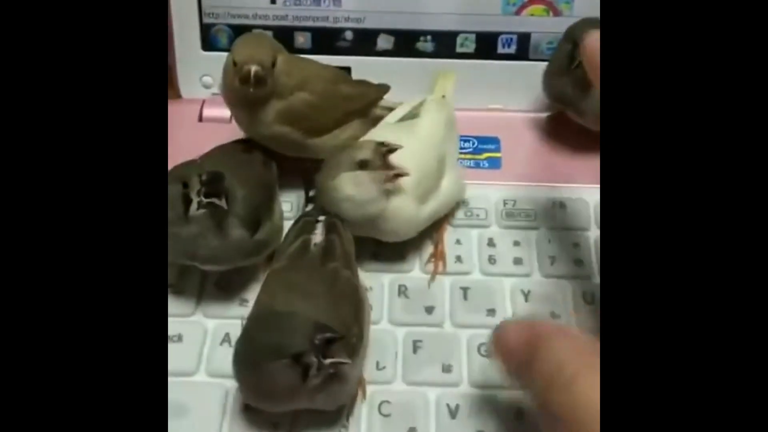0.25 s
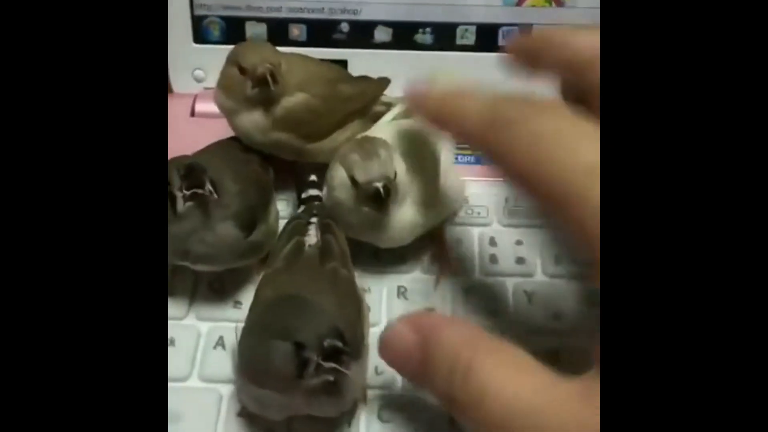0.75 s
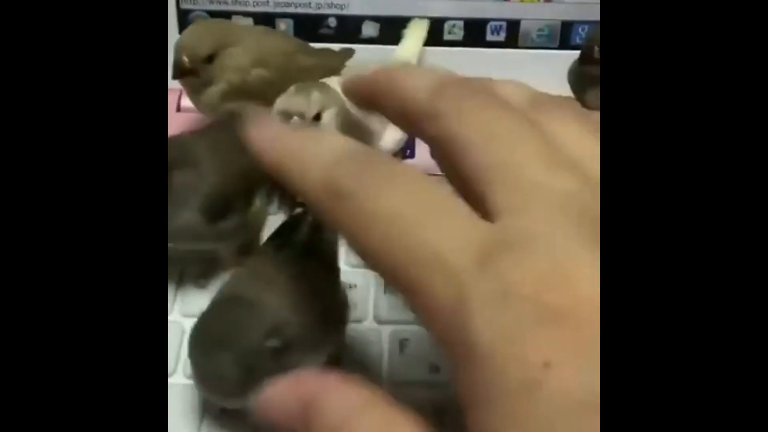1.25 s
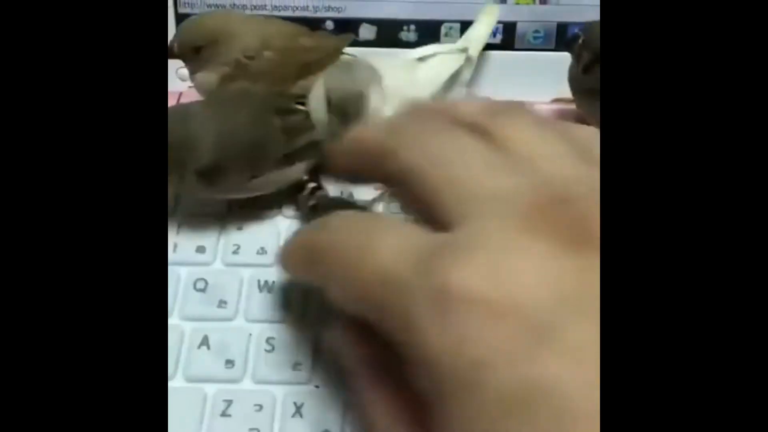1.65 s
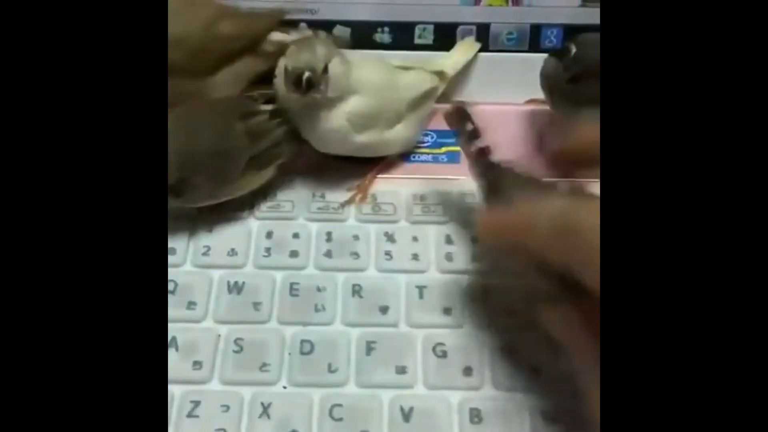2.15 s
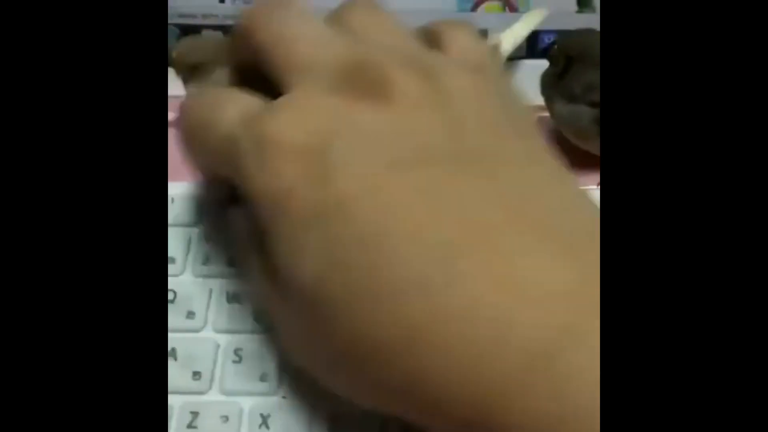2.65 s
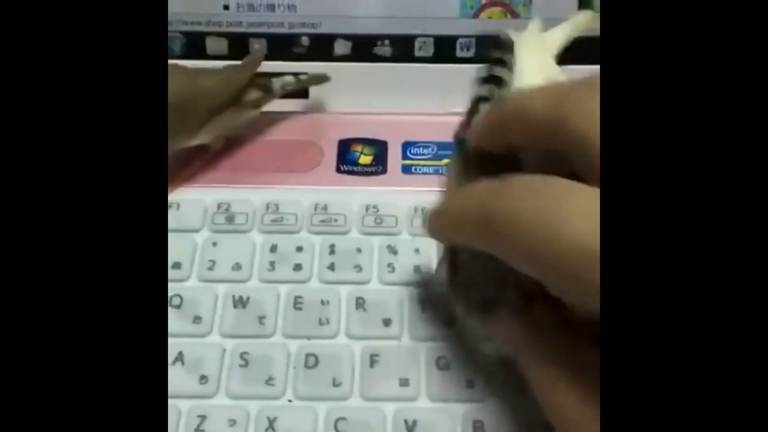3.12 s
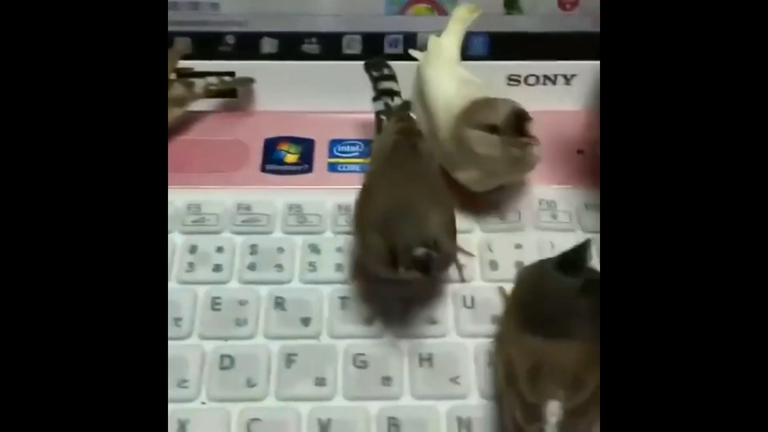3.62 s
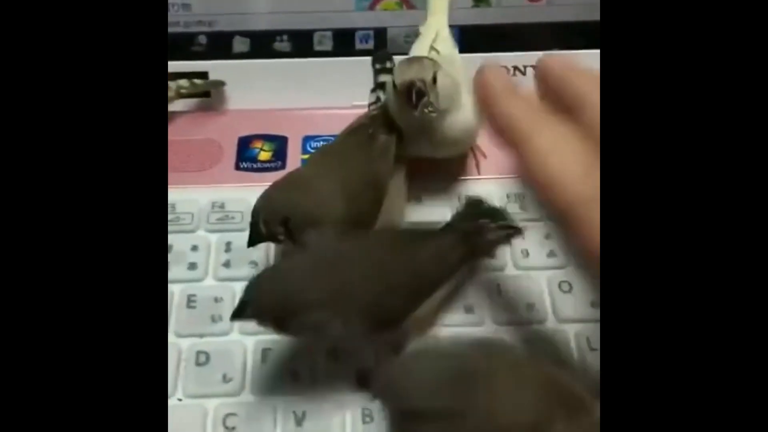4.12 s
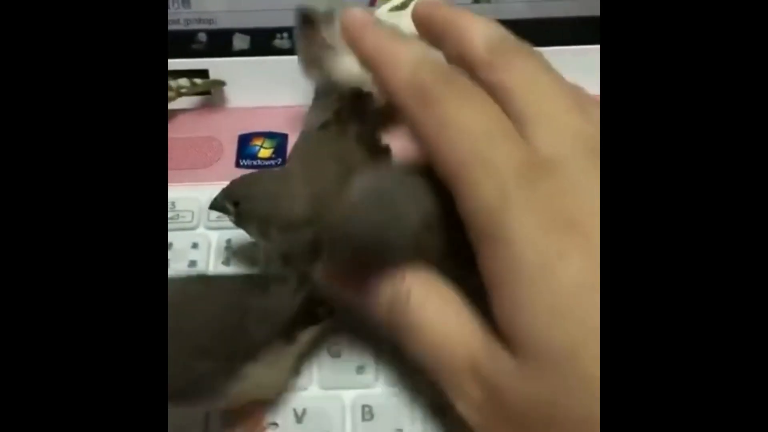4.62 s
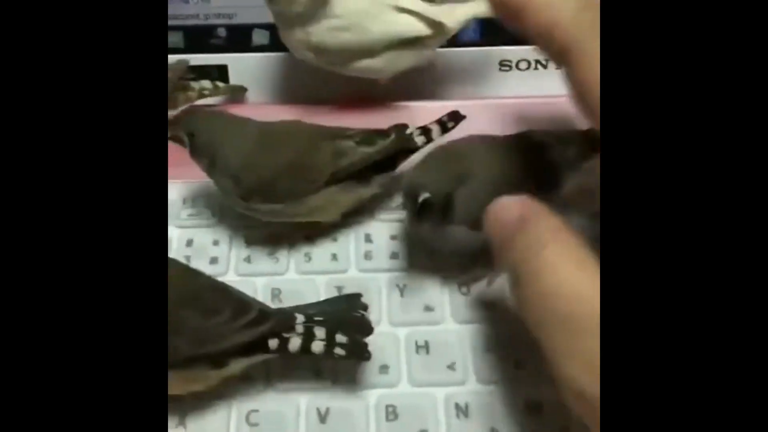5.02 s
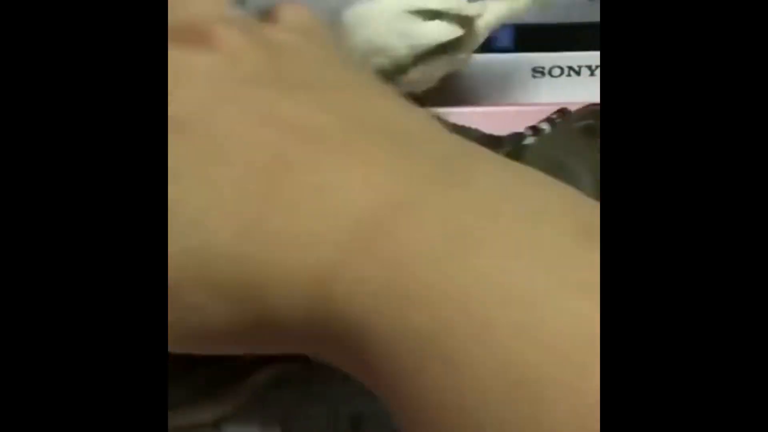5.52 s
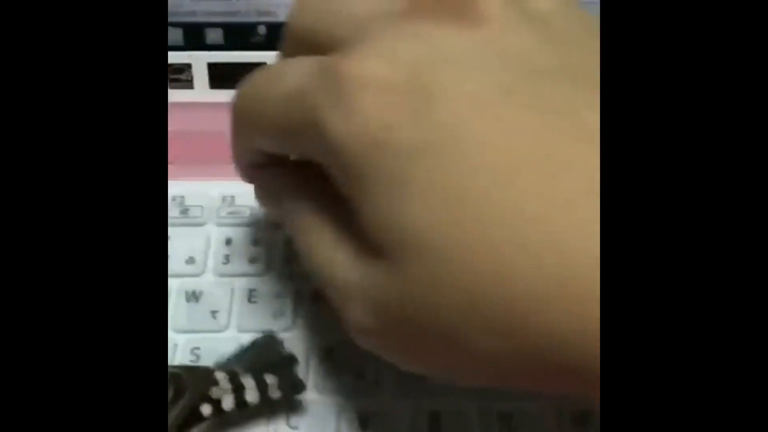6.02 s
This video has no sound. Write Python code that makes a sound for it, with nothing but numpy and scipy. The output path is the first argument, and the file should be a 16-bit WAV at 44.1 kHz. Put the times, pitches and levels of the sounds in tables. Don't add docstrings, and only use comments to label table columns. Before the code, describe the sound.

A handful of young finches call all at once on a laptop, very near a mono phone microphone. Reedy, rasping little beeps rise quickly and cut off, one steady double-pitched caller leading. Calling thins slightly after two seconds, where a tiny rustle and key clicks show, then thickens again to the end. Low fan rumble and slight hiss sit underneath, with a short dull room tail.

```python
import sys
import numpy as np
from scipy import signal
from scipy.fft import rfft, irfft
from scipy.io import wavfile

SR = 44100
rng = np.random.default_rng(int(sys.argv[2]) if len(sys.argv) > 2 else 0)


def generate_wav(signal):
    frames = np.transpose(np.atleast_2d(signal))
    scaled = np.clip(frames, -1, 1) * 32767
    pcm = np.round(scaled).astype(np.int16)
    wavfile.write(sys.argv[1], SR, pcm)


def convert_level_to_amplitude(level_db):
    exponent = np.asarray(level_db, float) / 20
    return 10 ** exponent


N = 276507


def band(x, low_hz, high_hz, order=2):
    return signal.sosfilt(signal.butter(order, [low_hz, high_hz], "band", fs=SR, output="sos"), x)


def rms_one(x):
    return x / np.sqrt(np.mean(x ** 2) + 1e-20)


def resonance(x, hz, width_hz):
    r = np.exp(-np.pi * width_hz / SR)
    feedback = [1, -2 * r * np.cos(2 * np.pi * hz / SR), r * r]
    return signal.lfilter(np.array([1, 0, -1]) * (1 - r * r) / 2, feedback, x)


def wander(size, rate_hz):
    r = np.exp(-2 * np.pi * rate_hz / SR)
    noise = rng.standard_normal(size + 2000)
    return rms_one(signal.lfilter([1], [1, -2 * r, r * r], noise)[2000:])


def along(curve, s):
    return np.interp(s, *np.transpose(curve))


def syrinx(pitch_hz, rough):
    n = len(pitch_hz)
    rough = rough * (1 + 1.2 * np.exp(-np.arange(n) / SR / .025))
    jitter = rough * (.04 * wander(n, 400) + .02 * wander(n, 30))
    phase = 2 * np.pi * (np.cumsum(pitch_hz * (1 + jitter)) / SR + rng.random())
    orders = np.arange(1, int(16000 / pitch_hz.max()) + 1)[:, None]
    pulses = np.cos(orders * phase - .015 * orders ** 2).sum(axis=0)
    pulses = rms_one(pulses) * convert_level_to_amplitude(4.5 * rough * wander(n, 200))
    air = rng.standard_normal(n) * (1.5 + np.cos(phase))
    hiss = rms_one(band(air, 1500, 18000, order=1))
    return pulses + 3.0 * rough * hiss, phase


# frequency in Hz, width in Hz, level in dB.
THROAT = [(1296, 860, 9.5), (2470, 3000, -14.5)]
BEAK_WIDTH_HZ = (1490, 1210, 1760, 2520)
SHRILL_HZ = (8490, 12130)


def tract(source, throat_db, open_db, first_hz, second_hz, second_db, shrill_db):
    n = len(source)
    t = np.arange(n) / SR
    throat = np.zeros(n)
    for k, (hz, width_hz, db) in enumerate(THROAT):
        flutter = convert_level_to_amplitude(db + 1.8 * wander(n, 29))
        throat += (-1) ** k * flutter * resonance(source, hz, width_hz)

    def beak_ring(hz, width_hz):
        ring = resonance(resonance(source, hz, width_hz), hz, 1.6 * width_hz)
        return convert_level_to_amplitude(3.0 * wander(n, 9)) * rms_one(ring)

    shrill_hz = np.array(SHRILL_HZ) * rng.uniform(0.904, 1.077, 2)
    first = beak_ring(first_hz, BEAK_WIDTH_HZ[0])
    second = beak_ring(second_hz, BEAK_WIDTH_HZ[1])
    third = beak_ring(shrill_hz[0], BEAK_WIDTH_HZ[2])
    fourth = beak_ring(shrill_hz[1], BEAK_WIDTH_HZ[3])
    early_ring = beak_ring(1.087 * second_hz, BEAK_WIDTH_HZ[1])
    early_share = np.exp(-(t / 0.022) ** 2)
    beak = first - convert_level_to_amplitude(second_db) * (np.sqrt(1 - early_share) * second + np.sqrt(early_share) * early_ring)
    smeared = rms_one((third - fourth) * np.cos(1.0 * wander(n, 1200)))
    top = smeared * convert_level_to_amplitude(-60 * (t - t.mean()))
    scale = np.sqrt(np.mean(beak ** 2))
    beak_sound = convert_level_to_amplitude(open_db) / scale * (beak + convert_level_to_amplitude(shrill_db) * top)
    return convert_level_to_amplitude(throat_db) * (rms_one(band(throat, 733, 3130)) + beak_sound)


def call(out, rows, colour, voice):
    s, *columns = np.transpose(rows)
    start = max(int((s[0] - .006) * SR), 0)
    stop = min(int((s[-1] + .03) * SR), N)
    t = np.arange(start, stop) / SR
    pitch_hz, throat_db, open_db = (np.interp(t, s, c) for c in columns)
    rise = 1 if start == 0 else np.clip((t - t[0]) / .02, 0, 1)
    leak = np.clip(t - s[-1] + .010, 0, 1) / .04
    sound = tract(voice(pitch_hz * (1 - 0.2 * leak)), throat_db, open_db, *colour)
    sound = sound * rise * convert_level_to_amplitude(-42.0 * leak)
    lag = int(rng.uniform(.0003, .0009) * SR)
    sound = sound + .4 * np.pad(sound, (lag, 0))[:len(t)]
    return out + np.pad(sound, (start, N - stop))


def voiced(out, s, pitch_hz, open_db, second_db, body, voice):
    throat_db, first_hz, shrill_db, nearness, facing = body
    throat_level = throat_db + along(nearness, s) - 0.15 * open_db
    rows = np.transpose([s, pitch_hz, throat_level, open_db])
    first_hz = first_hz + 9 * (open_db.max() - 7)
    second_hz = 6290 - 3 * second_db
    colour = first_hz, second_hz, second_db, shrill_db + along(facing, s.mean())
    return call(out, rows, colour, voice)


def chick(calls, habit, body, voice):
    scoop, rise_s, climb, shut_db, open_s, close_db = habit
    out = np.zeros(N)
    for s, length, top_hz, open_db, second_db in calls:
        t = np.linspace(0, length, num=16)
        opening = open_db - shut_db * np.exp(-t / open_s) - close_db * (t / length) ** 2
        below = scoop * np.exp(-(t / rise_s) ** 1.38)
        pitch_hz = top_hz * (1 - below - climb * (length - t))
        out = voiced(out, s + t, pitch_hz, opening, second_db, body, voice)
    return out


# start in seconds, length in seconds, top pitch in Hz,
# beak opening in dB over the throat, second beak resonance in dB.
SCOOPER = [(0.47, 0.082, 704, 13.5, -6), (0.57, 0.11, 677.2, 18, -1), (0.71, 0.2, 687.6, 15, -3.5),
           (1.82, 0.11, 633.5, 7, -14), (1.985, 0.11, 688, 1.5, -8), (2.365, 0.12, 661, 4, -28),
           (2.81, 0.072, 745, 10.5, -7), (3.06, .12, 744, 10.5, -3), (3.21, 0.18, 744, 10.5, -1.5),
           (3.68, 0.045, 767, 14, 8), (4.08, 0.1774, 725.5, 11.5, -5), (4.555, 0.13, 679, 10, -13),
           (5.17, 0.24, 733, 14, 2.5), (5.74, 0.12, 818, 3, -5.5), (5.91, 0.049, 784, 3, -14),
           (6.125, 0.1, 651, 3.5, 0)]
# start in seconds, length in seconds, top pitch in Hz,
# beak opening in dB over the throat, second beak resonance in dB.
STEADY = [(0.0, 0.091, 727.4, 12.5, -7.5), (1.32, 0.13, 756, 9.5, -18), (1.56, 0.092, 740, 14, -16),
          (1.72, 0.042, 727.7, -4, -23), (2.99, 0.088, 777, 4.5, -17), (3.4, 0.14, 734, 15, 0),
          (3.57, 0.096, 731, 13.5, -4.5), (3.84, 0.069, 735, 10.5, -19), (3.91, .13, 730, 13, -2),
          (4.68, .11, 730, 14, -8.5), (4.82, .09, 722, 10, -31.5), (4.97, .15, 721, 12.5, -1),
          (5.49, .075, 758, 9, 1.5), (5.58, 0.13, 721, 7.5, 6), (5.94, .1, 713, 4, -19),
          (6.235, 0.044, 694, 3.5, -4)]
# start below pitch as a share 0-1, rise time in seconds, later climb as a share per second,
# beak shut at the start in dB, opening time in seconds, beak closing at the end in dB.
SCOOPER_HABIT = (.2, .04, 0.28, 11.5, 0.039, 3.1)
STEADY_HABIT = (.07, .04, .3, 9.6, 0.032, 2.3)
# throat level in dB, first beak resonance in Hz, shrill top in dB.
SCOOPER_BODY = (-25, 3925, -17)
STEADY_BODY = (-24.5, 4040, -17.5)
# time in seconds, level in dB.
NEARNESS = [(0, 1), (.8, 0), (1.5, -5.5), (2.1, -1.5), (2.7, -4), (3.3, -2), (3.9, -2), (4.5, -3),
            (5.099, 0), (5.6, -0.5), (6.27, -1.5)]
# time in seconds, gain of the shrill top in dB.
FACING = [(0, 3), (.4, -1), (.85, 1.5), (1.3, -4), (1.6, 5), (2.0, 4), (2.45, 3.5), (2.75, 3.5), (3.3, 6.5),
          (3.6, 6.5), (4.0, 6), (4.3, -3), (4.7, 5.5), (5.0, -2), (5.4, 7.5), (5.7, 13.5), (6.0, -5),
          (6.27, 8)]
# time in seconds, pitch in Hz,
# throat level in dB, beak opening in dB over the throat.
CLEAR = [
    [(0.13, 547.3, -25.5, 7), (0.17, 571, -27.5, 11.5), (0.2, 618.4, -28.5, 11), (0.29, 608, -29, 11.5),
     (0.33, 580, -23.5, 7)],
    [(0.98, 616, -26, 0), (1.015, 574, -27.5, 9.5), (1.07, 609, -25, 10), (1.16, 569.5, -29.5, 17.5),
     (1.25, 526, -32, 7.5)],
    [(1.42, 524.3, -28, 13), (1.44, 508.5, -27, 17), (1.5, 535.7, -31, 16), (1.56, 537, -24.5, 5.5)],
    [(2.555, 496, -27, 3), (2.62, 524.6, -35.5, 15), (2.7, 535.4, -29, 17.5), (2.78, 517, -31.5, 5.5)],
    [(4.255, 545.5, -24, 7), (4.3, 623, -27, 11), (4.35, 665, -26, 10.5), (4.4, 672, -27, 10.5),
     (4.43, 590, -39, 14)],
]
CLEAR_ROUGH = [.2, .13, .07, .3, .2]
# first beak resonance in Hz, second in Hz, second in dB, shrill top in dB.
CLEAR_COLOUR = [(4057, 6700, -12, -12.5), (4090, 6100, -10, -14), (3930, 5700, -10.5, -17),
                (4020, 6260, -6, -15.5), (4380, 6900, -12.5, -16.5)]


def solo_chicks():
    scooper_body = (*SCOOPER_BODY, NEARNESS, FACING)
    steady_body = (*STEADY_BODY, NEARNESS, FACING)
    out = chick(SCOOPER, SCOOPER_HABIT, scooper_body, lambda hz: syrinx(hz, .25)[0])
    out = out + chick(STEADY, STEADY_HABIT, steady_body, lambda hz: syrinx(hz, .3)[0])
    for rows, colour, rough in zip(CLEAR, CLEAR_COLOUR, CLEAR_ROUGH):
        out = call(out, rows, colour, lambda hz: syrinx(hz, rough)[0])
    return out


def both_halves(pitch_hz, ratio, rough=.21, lower_db=1.5, coupling=.2):
    high, high_phase = syrinx(pitch_hz, rough)
    low, low_phase = syrinx(pitch_hz * ratio, rough)
    upper_voice = high * (1 + coupling * np.cos(low_phase))
    lower_voice = low * (1 + coupling * np.cos(high_phase))
    return upper_voice + convert_level_to_amplitude(lower_db) * lower_voice


# start in seconds, length in seconds, top pitch in Hz, beak opening in dB over the
# throat, second beak resonance in dB.
DUO_CALLS = [(0.18, 0.12, 951, 19.5, 1.5), (0.34, 0.15, 933, 16.5, -3), (0.555, 0.1196, 923, 13, -10),
             (0.85, 0.087, 935, 19, 0), (1.08, 0.085, 912, 17, -5.5), (1.335, 0.099, 924, 18, -7),
             (1.6, .12, 955.5, 14, -5), (1.86, 0.079, 944, 15, -1), (2.085, 0.1, 941, 16.5, -1.5),
             (2.44, 0.11, 960, 17.5, 0.5), (2.62, 0.13, 951, 3, 13), (2.87, 0.11, 932, 7, -10),
             (3.273, 0.084, 965, 12.5, 13), (3.486, 0.12, 971.5, 19, 5.5), (3.711, .14, 963, 17.5, -1),
            (3.92, 0.11, 947, 19.5, 0.5), (4.136, 0.098, 926, 15, -1.5), (4.444, .11, 951, 17.5, -4),
            (4.679, 0.099, 938, 19, 0.5), (4.892, 0.11, 964, 19.5, -4), (5.173, 0.086, 952, 19, 0.5),
            (5.384, 0.11, 961, 21.5, -2.5), (5.562, 0.12, 957, 12.5, 7.5), (5.814, .11, 951, 4.5, 1.5),
            (6.033, 0.11, 950, 10, -4.5)]
# start below pitch as a share 0-1, rise time in seconds, later climb as a share per second,
# beak shut at the start in dB, opening time in seconds, beak closing at the end in dB.
DUO_HABIT = (.08, .025, 0.1188, 11.9, 0.039, 4.7)
# throat level in dB, first beak resonance in Hz, shrill top in dB.
DUO_BODY = (-23, 4090, -11.5)
# time in seconds, level in dB.
DUO_NEARNESS = [(0, -2), (.8, -2.5), (1.5, -1.5), (2.1, -2), (2.7, -0.5), (3.3, -1.5), (3.9, 0),
                (4.5, -0.5), (5.0, -3), (5.5, -1.5), (5.9, 1.5), (6.27, 2)]
# time in seconds, gain of the shrill top in dB.
DUO_FACING = [(0.2, 2), (.6, 1.5), (.9, -4), (1.3, -5), (1.65, 3), (2.1, 2.5), (2.5, 6.5), (2.7, -12),
              (3.3, -6), (3.55, 6), (4.0, 1.5), (4.2, 1), (4.5, 4), (4.9, -2.5), (5.4, 0), (5.85, 6),
              (6.1, -1.5)]


def duo_chick():
    body = (*DUO_BODY, DUO_NEARNESS, DUO_FACING)
    return chick(DUO_CALLS, DUO_HABIT, body, lambda hz: both_halves(hz, .805))


# time in seconds, thud level in dB, key tick level in dB.
KNOCKS = [(1.81, -46, -35), (2.012, -36, -30), (2.286, -60, -38), (2.304, -60, -38), (2.326, -39, -21),
          (2.362, -44, -30), (2.881, -32, -28), (2.987, -36, -27), (3.053, -35, -18), (3.169, -30, -28),
          (3.326, -28, -33), (3.793, -28, -34), (4.026, -32, -34), (4.291, -36, -29), (6.014, -25, -12),
          (6.243, -32, -25)]
# frequency in Hz, level in dB, time to fade by 60 dB in seconds.
CASE = [(352, 10, 0.03), (548, 7.5, 0.0245)]


def claws():
    size = 4000
    out, t = np.zeros(N + size), np.arange(size) / SR
    for s, thud_db, key_db in KNOCKS:
        scrape = rng.standard_normal(size) * np.clip(t / .0015, 0, 1) * convert_level_to_amplitude(-60 * t / .016)
        knock = rms_one(band(scrape, 600, 2100)) * convert_level_to_amplitude(key_db - 16.0)
        for hz, db, t60 in CASE:
            level = convert_level_to_amplitude(thud_db + db + rng.normal(0, 2.2) - 60 * t / t60)
            knock = knock + np.sin(2 * np.pi * hz * t) * level
        start = int(s * SR)
        out[start:start + size] += band(knock, 540, 7500)
    return out[:N]


# time in seconds, level in dB.
RUSTLE = [
    (2.27, -58),
    (2.332, -44),
    (2.36, -85.5),
]


def rustle():
    s, db = np.transpose(RUSTLE)
    level = convert_level_to_amplitude(np.interp(np.arange(N) / SR, s, db, left=-120, right=-120))
    grains = rng.standard_normal(N) * convert_level_to_amplitude(4.0 * wander(N, 150))
    return level * rms_one(band(grains, 1700, 14000, order=1))


# frequency in Hz, level in dB.
FLOOR = [(18, -34), (30, -2), (86, -5), (184, 5), (286, -4.5), (450, -6), (580, 1.5), (990, -120)]


def floor():
    hz, db = np.transpose(FLOOR)
    bins_hz = np.arange(1, N // 2 + 2) * SR / N
    shape = convert_level_to_amplitude(np.interp(np.log(bins_hz), np.log(hz), db))
    rumble = rms_one(irfft(rfft(rng.standard_normal(N)) * shape, N))
    hum = rms_one(resonance(rng.standard_normal(N), 93.6, 8.3))
    hiss = rms_one(band(rng.standard_normal(N), 300, 3500, order=1))
    return convert_level_to_amplitude(-53) * (convert_level_to_amplitude(2.2 * wander(N, 4)) * rumble + convert_level_to_amplitude(-7.0) * hum + convert_level_to_amplitude(-4.0) * hiss)


def room(x):
    t60_s, level_db = .14, -17
    t = np.arange(int(.3 * SR)) / SR
    noise = band(rng.standard_normal(len(t)), 183, 3130, order=1)
    tail = noise * convert_level_to_amplitude(-60 * t / t60_s) * (t > .003)
    tail = tail / np.sqrt(np.sum(tail ** 2))
    return convert_level_to_amplitude(level_db) * signal.fftconvolve(x, tail)[:N]


def scene():
    near = solo_chicks() + duo_chick() + claws()
    return np.tile(near + room(near) + rustle() + floor(), (2, 1))


def band_limit(x):
    return signal.sosfilt(signal.butter(12, 15690, fs=SR, output="sos"), x)


def record(dry):
    soft = dry / (1 + (dry / .8) ** 4) ** .25
    top_cut = signal.cheby2(12, 70, 16300, fs=SR, output="sos")
    mix = signal.sosfilt(top_cut, soft)
    return band_limit(mix)


dry = scene()
out = record(dry)
generate_wav(out)
```